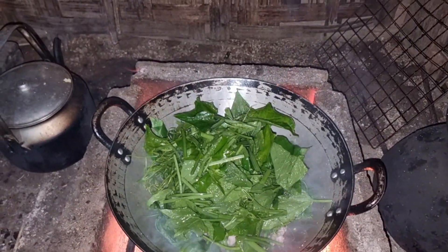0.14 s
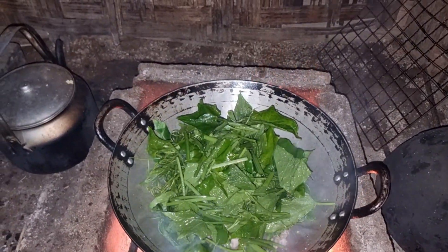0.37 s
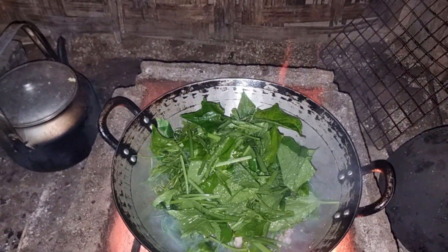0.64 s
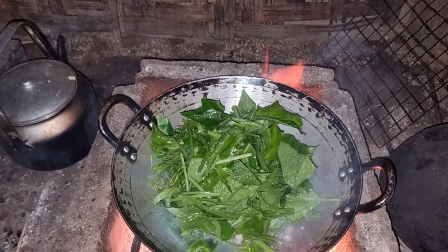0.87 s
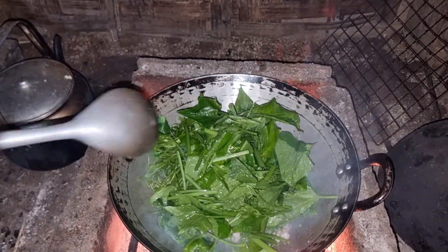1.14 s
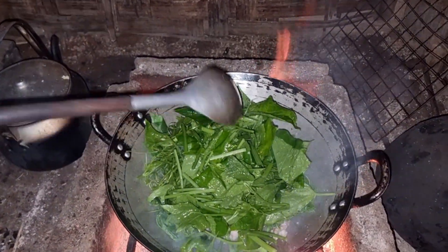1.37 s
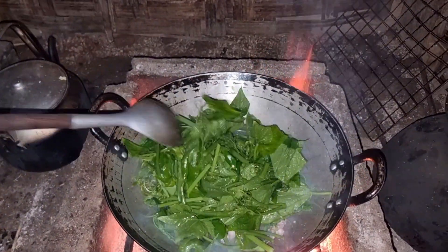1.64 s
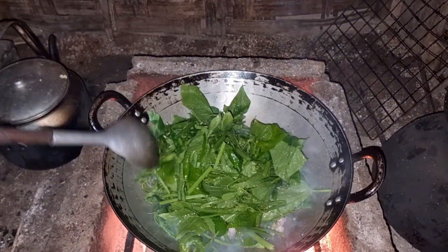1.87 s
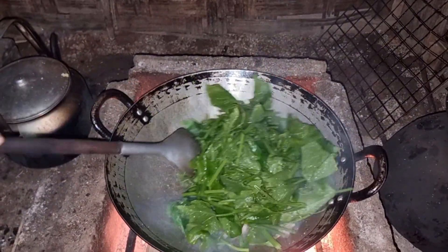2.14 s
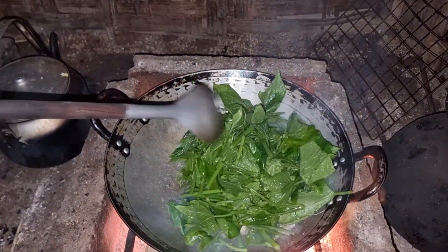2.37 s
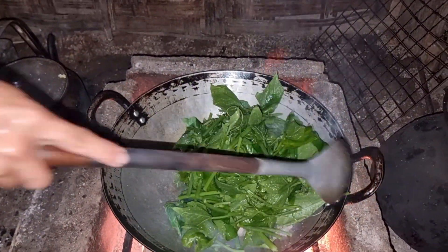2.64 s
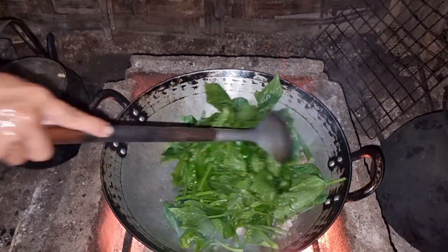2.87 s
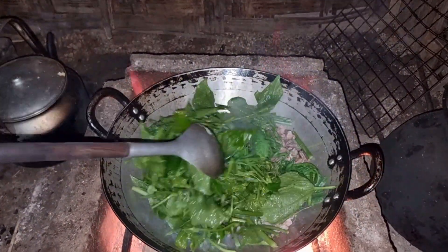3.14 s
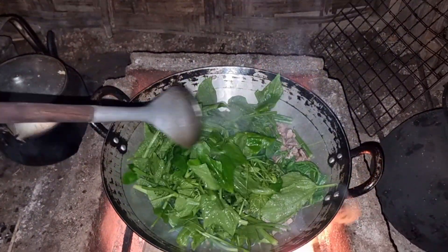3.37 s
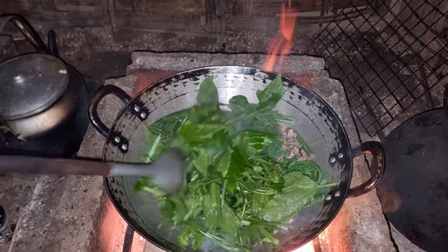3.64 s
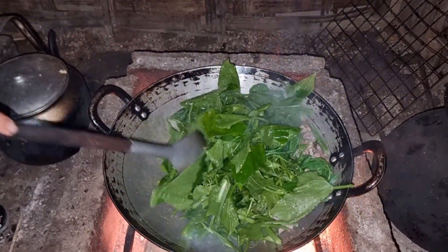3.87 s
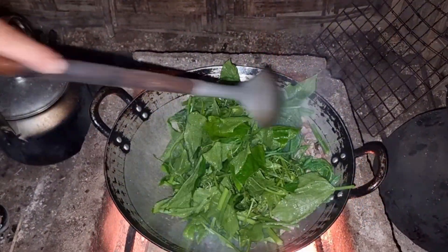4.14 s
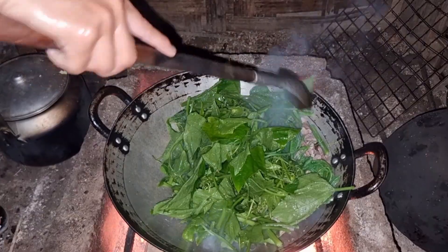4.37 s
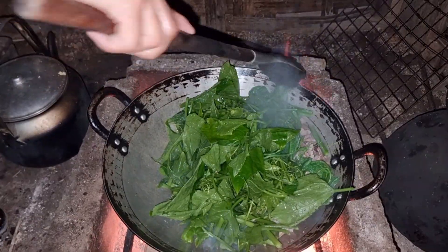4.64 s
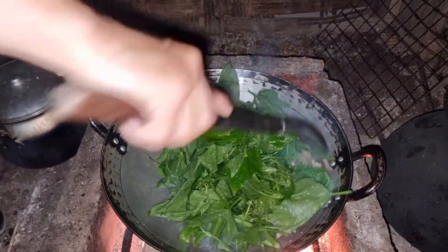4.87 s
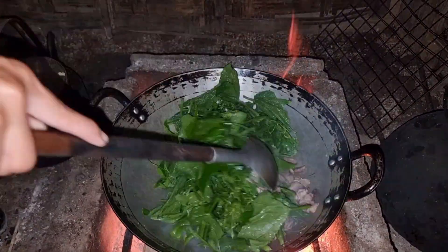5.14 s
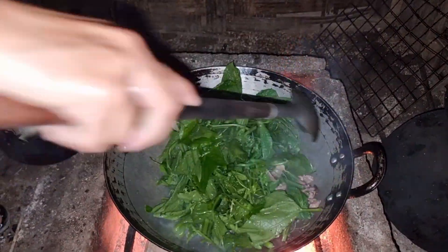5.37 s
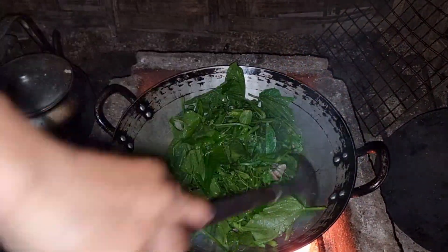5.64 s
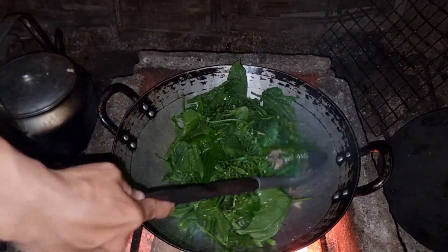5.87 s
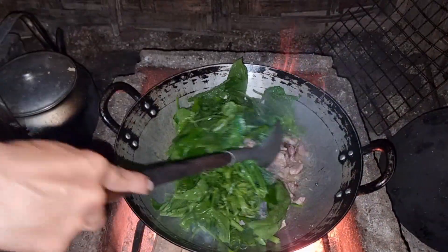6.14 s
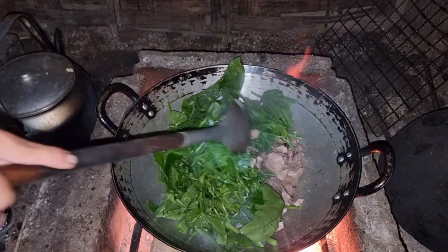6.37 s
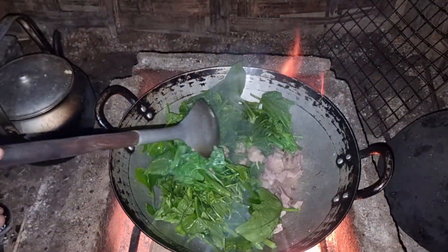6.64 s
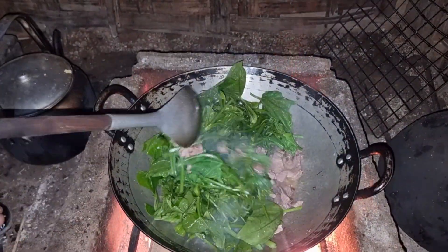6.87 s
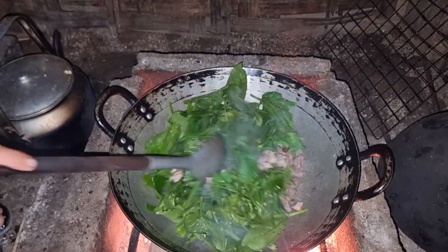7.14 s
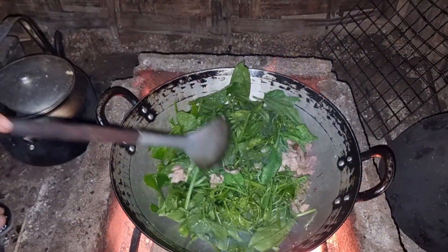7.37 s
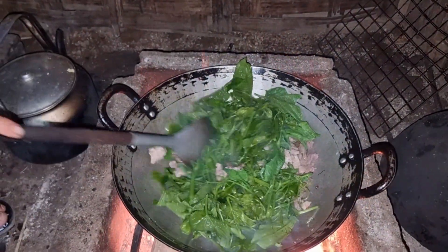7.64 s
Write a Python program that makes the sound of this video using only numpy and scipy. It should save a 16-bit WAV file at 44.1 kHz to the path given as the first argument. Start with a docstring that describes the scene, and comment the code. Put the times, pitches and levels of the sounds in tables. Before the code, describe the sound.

A close stereo sound of meat and wet greens frying in an iron wok. From 0 s a dense, grainy sizzle runs steadily, slightly wavering, over a soft low fire rumble and barely audible kitchen air. A gush of steam begins near 1.6 s, and at about 2 s the hiss swells sharply, leaving the frying fuller and louder by 2.3 s. Short, bright fat spits crack at about 2.4, 2.7 and 3.4 s. Steam surges again at 3.3 and 3.9 s, then briefly at 4.8 and 5.1 s. Around 5 s the ladle gives a dull, damped knock with tiny rebounds; another very faint touch follows at 5.55 s. The fire sinks and the sizzle gradually thins, with a strong spit at 5.85 s and more cracks near 6.8 s. Hiss swells at 7.35 s and again towards the end at 7.7 s.

```python
"""A broad, wavering sizzle comes first: meat and greens fry in an iron wok, over a wood fire's rumble.
Thousands of steam bubbles burst in the fat each second; gushes of steam swell and brighten the sizzle
as a ladle turns wet leaves onto hot iron. Later, large bubbles spit as short pitched cracks and the ladle
knocks the wok, ringing its damped modes. Shaped noise makes the fire and a faint murmur of kitchen air.
Two microphone ports hear the bowl by different paths."""
import sys
import numpy as np
from scipy import signal
from scipy.fft import rfft, irfft, next_fast_len
from scipy.io import wavfile

SR = 44100
rng = np.random.default_rng(int(sys.argv[2]) if len(sys.argv) > 2 else 0)


def output_pcm(signal):
    """Save a mono or channel-first signal as 16-bit PCM at the path in sys.argv[1].

    Samples are clipped to [-1, 1] before scaling.
    """
    pcm = np.clip(np.atleast_2d(signal).T, -1, 1) * 32767
    wavfile.write(sys.argv[1], SR, np.round(pcm).astype(np.int16))


def volts_from_decibels(level):
    """Turn decibel levels (scalar or array-like) into linear amplitude factors."""
    exponent = np.asarray(level, float) / 20
    return 10 ** exponent


N = 341775
SIZE = next_fast_len(N + 8192)
HZ = np.maximum(np.arange(SIZE // 2 + 1) * SR / SIZE, 1)


def rms_one(x):
    """Scale to unit power."""
    return x / np.sqrt(np.mean(x ** 2) + 1e-20)


def curve_in_time(rows):
    """Second column of (s, value) rows, one value a sample."""
    time_s, value = np.transpose(rows)
    return np.interp(np.arange(N) / SR, time_s, value)


def at_hz(points):
    """(Hz, value) points read at every frequency, on a log axis."""
    hz, value = np.transpose(points)
    return np.interp(np.log(HZ), np.log(hz), value)


def shaped(x, response):
    """Filter by a frequency response."""
    return irfft(rfft(x, SIZE) * response, SIZE)[..., :N]


def filtered(x, hz, kind="low"):
    """Second-order Butterworth filter."""
    return signal.sosfilt(signal.butter(2, hz, kind, fs=SR, output="sos"), x)


def drift(corner_hz):
    """Slow noise of spread 1: two equal poles at corner_hz."""
    step, settle = 40, 2000  # samples per slow point; slow points dropped
    r = np.exp(-2 * np.pi * corner_hz * step / SR)
    noise = rng.standard_normal(N // step + settle + 2)
    slow = signal.lfilter([1], [1, -2 * r, r * r], noise)[settle:]
    return np.interp(np.arange(N) / step, np.arange(len(slow)), rms_one(slow))


def clicks(rows):
    """Click train from (s, dB) rows."""
    out = np.zeros(N)
    for start_s, level_db in rows:
        out[round(start_s * SR)] = volts_from_decibels(level_db)
    return out


def ring(x, hz, t60_s):
    """Damped resonance: a unit click starts a decaying sine of initial height 1."""
    r, w = volts_from_decibels(-60 / (t60_s * SR)), 2 * np.pi * hz / SR
    return signal.lfilter([0, np.sin(w)], [1, -2 * r * np.cos(w), r * r], x + 1e-18)


BURSTS_PER_S = 14000


def bursts(spread_db):
    """Bubbles burst at random moments with random sign; most are small, a few large."""
    size_db = spread_db * np.minimum(rng.exponential(1, N), 6)
    pulses = volts_from_decibels(size_db) * rng.choice([-1, 1], N)
    return rms_one(pulses * (rng.random(N) < BURSTS_PER_S / SR))


# steam as the ladle turns fresh leaves onto the iron; each bubble size takes a share of swell_db
# peak_s, swell_db, fall_s (bell spread after the peak)
STEAM_GUSHES = [(0.1, 1.5, 0.13), (1.65, 4, 0.15), (2.025, 6.5, 0.26), (2.35, 0.5, 0.065),
                (3.307, 3.5, 0.15), (3.857, 5, 0.24), (4.052, 0, 0.19), (4.467, 2, .06),
                (4.778, 5.5, 0.078), (5.098, 6, 0.023), (5.86, 2.8, 0.033), (7.35, 5, 0.19), (7.7, 6, 0.15)]


def gushes_db():
    """Every gush of steam swells and fades as a lopsided bell, in dB."""
    t = np.arange(N) / SR
    total_db = np.zeros(N)
    for peak_s, swell_db, fall_s in STEAM_GUSHES:
        spread_s = fall_s * np.where(t < peak_s, 0.49, 1)  # the rise is shorter
        total_db += swell_db * np.exp(-.5 * ((t - peak_s) / spread_s) ** 2)
    return total_db


# paths to the right port, timed against the left; a negative delay is heard earlier
# delay_ms, pressure_share (before PATH_GAIN and the cap), blur_above_hz
PATHS_TO_RIGHT = [(-.057, -.1, 4840), (.112, .25, 6490), (.409, 1.16, 820), (.656, -.45, 1060),
                  (1.943, .17, 2580), (2.339, -.19, 3270), (2.537, .09, 9000), (3.06, .14, 2710),
                  (3.367, -.12, 1910)]
PATH_GAIN = 1.125  # weight against sound scattered to the right port alone


def right_paths():
    """Bursts both ports share: past the housing and off the rim, dulled by the spread of the spots."""
    paths = 0
    for delay_ms, share, blur_hz in PATHS_TO_RIGHT:
        delay = np.exp(-2j * np.pi * HZ * delay_ms / 1000)
        paths = paths + share * delay / (1 + (HZ / blur_hz) ** 2)
    paths = PATH_GAIN * paths
    return paths / np.maximum(abs(paths) / .96, 1)  # shared part at most 0.96


def port(colour, bowl):
    """Colour of the bursts times the air resonances and dips of the bowl."""
    db = at_hz(colour)
    for hz, width_hz, level_db in bowl:
        db = db + level_db / (1 + (2 * (HZ - hz) / width_hz) ** 2)
    return volts_from_decibels(db)


def wandering(x, depth_db, width_hz, hold_s):
    """Frying spots shift under the leaves: narrow ridges of colour come and go, alike at both ports."""
    hz, s, frames = signal.stft(x, SR, nperseg=1024)
    field = rng.standard_normal(frames.shape[1:])
    for cells, axis in ((width_hz / hz[1], 0), (hold_s / (s[1] - s[0]), 1)):
        bell = np.exp(-.5 * (np.arange(-40, 41) / cells) ** 2)
        field = signal.fftconvolve(field, np.expand_dims(bell, 1 - axis), "same")
    ridges = volts_from_decibels(depth_db * rms_one(field))
    return signal.istft(frames * ridges, SR, nperseg=1024)[1][:, :N]


# colour of the bursts at each port: pitch_hz, relative_db (per Hz)
LEFT_BURST_COLOUR = [(150, -35), (250, -25.2), (450, -16), (530, -10), (600, -7.2), (1000, -0.3),
                     (1600, -3.9), (2900, -1.5), (4300, -6.6), (4900, -9), (6000, -8.3), (9000, -10.2),
                     (11000, -9.4), (12500, -7.2), (15500, -5.5)]
RIGHT_BURST_COLOUR = [(150, -33), (250, -23.2), (450, -19), (530, -14), (600, -11.7), (1000, -3.0),
                      (1600, -1.5), (2900, 5.2), (4400, -6), (5000, -11.5), (6000, -12.7), (9000, -14.1),
                      (11000, -10.7), (12500, -3.3), (15500, -6.4)]
# air resonances and dips of the bowl at each port: pitch_hz, width_hz, level_db
LEFT_BOWL_AIR = [(269, 24, 4.2), (307, 8, 4.5), (484, 26, -3.3), (569, 85, 3.1), (722, 107, -2.5),
                 (1043, 26, 1.5), (1199, 71, 3.9), (1255, 95, -4.4), (1367, 30, 4.4), (1482, 57, -3.1),
                 (1692, 165, 2.2), (1856, 85, -3.0), (2442, 180, 6.7), (2540, 392, -5.0), (2868, 167, 3.6)]
RIGHT_BOWL_AIR = [(311, 27, 3.5), (343, 25, -6.1), (377, 38, 5.0), (491, 9, -5.6), (567, 34, 5.8),
                  (671, 13, -4.1), (739, 80, 6.5), (800, 25, -4), (930, 45, -8.9), (1171, 28, 2.3),
                  (1254, 25, -3.5), (1302, 26, 3.8), (1367, 28, 5.1), (1472, 166, -6.5), (1892, 47, 3.5),
                  (2030, 145, 5.0), (2151, 329, -5.5), (2620, 170, -3), (2873, 110, 2.7), (3170, 120, -2.5),
                  (3400, 300, 2), (13950, 300, 2.5)]
# how much wet food lies on hot iron: time_s, vigour_db (each bubble size takes a share of its swing)
WET_FOOD_VIGOUR = [(0, -27), (1.4, -27), (2.09, -30.5), (2.2, -26), (2.34, -21), (2.5, -22), (2.8, -23.5),
                   (3.65, -25), (3.9, -22.5), (4.3, -22), (4.85, -22), (5.05, -24), (5.3, -26),
                   (6.1, -26.5), (7.05, -27.5), (7.3, -28), (7.75, -29.5)]
MEAN_VIGOUR_DB = -25
# bubble sizes, large to fine:
# level_db (at mean vigour), vigour_share, gush_share, common_flicker_db, own_flicker_db
JUICE_BUBBLES = (-33, 0.6, 0.18, 0.23, -0.18)
SIZZLE_BUBBLES = (-24.5, 1.01, 0.29, 0.64, 0.48)
HISS_BUBBLES = (-24.5, 1.32, 0.89, -0.46, 0.55)
DULL_HZ, FINE_HZ = 1400, 5000  # bubbling gives way to sizzle, sizzle to hiss


def frying():
    """Dense bursts at both ports; three bubble sizes follow vigour and gushes, the finest most."""
    swing_db = curve_in_time(WET_FOOD_VIGOUR) - MEAN_VIGOUR_DB
    gush_db = gushes_db()
    left, other = rfft([bursts(spread_db=2.5), bursts(spread_db=1.57)], SIZE)
    shared = right_paths()
    right = shared * left + np.sqrt(1 - abs(shared) ** 2) * other
    heard = np.array([left * port(LEFT_BURST_COLOUR, LEFT_BOWL_AIR),
                      right * port(RIGHT_BURST_COLOUR, RIGHT_BOWL_AIR)])
    moving = wandering(irfft(heard, SIZE)[:, :N], depth_db=2.0, width_hz=30, hold_s=0.065)

    dull = 1 / (1 + (HZ / DULL_HZ) ** 8)
    fine = 1 / (1 + (FINE_HZ / HZ) ** 8)
    bands = ((dull, JUICE_BUBBLES), (1 - dull - fine, SIZZLE_BUBBLES), (fine, HISS_BUBBLES))
    common_flicker = drift(29)  # slow random flicker: sizzle and bubbling rise as the hiss sinks
    out = 0
    for band, (mean_db, vigour_share, gush_share, common_db, own_db) in bands:
        level_db = mean_db + vigour_share * swing_db + gush_share * gush_db
        flicker_db = common_db * common_flicker + own_db * drift(14)
        layer = shaped(moving, band)
        layer = layer / np.std(layer.mean(axis=0))
        out = out + volts_from_decibels(level_db + flicker_db) * layer
    return out


# the fire's rumble swells three times, then sinks: time_s, rumble_db
FIRE_LEVEL = [(0, -47), (1.5, -44), (1.9, -46.5), (2.25, -43), (3.6, -47.5), (4.6, -43), (5.2, -49),
              (6, -51), (7.75, -51.5)]
# spectrum of the flames: pitch_hz, relative_db (per Hz)
FLAME_COLOUR = [(15, -56), (25, -30), (63, -6.5), (80, 2), (95, 0.5), (139, -13), (221, -27), (430, -56),
                (730, -120)]


def fire():
    """Turbulent flames: low lumpy noise, nearly the same at both ports."""
    mid, side = shaped(rng.standard_normal((2, N)), volts_from_decibels(at_hz(FLAME_COLOUR)))
    stereo = mid + volts_from_decibels(-21) * side * np.array([[1], [-1]])
    stereo = stereo * volts_from_decibels([[-.5], [.5]])
    level_db = curve_in_time(FIRE_LEVEL) + 1.0 * drift(18)
    return rms_one(stereo) * volts_from_decibels(level_db)


# spectrum of the kitchen air: pitch_hz, relative_db (per Hz)
ROOM_COLOUR = [(60, -30), (110, 1), (160, 7), (220, -7), (400, -31)]
ROOM_LEVEL_DB = -59.5


def room_tone():
    """Kitchen air: a faint, steady low murmur, a little different at each port."""
    response = volts_from_decibels(at_hz(ROOM_COLOUR)) / (1 + (HZ / 500) ** 4)
    mid, side = shaped(rng.standard_normal((2, N)), response)
    return volts_from_decibels(ROOM_LEVEL_DB) * rms_one(mid + volts_from_decibels(-8) * side * np.array([[1], [-1]]))


# single loud spits of fat: start_s, click_db, pitch_hz
FAT_SPITS = [(2.3684, -9, 3000), (2.6973, -6, 2430), (3.3687, -9, 3000), (3.8309, -9, 5000),
             (4.0393, -8, 2400), (4.4402, -7, 4000), (4.7994, -6, 2600), (5.0962, -6, 6500),
             (5.449, -12, 2860), (5.6642, -12, 3000), (5.8493, -1, 3000), (6.2824, -12, 2850),
             (6.6048, -13, 2880), (6.748, -8, 3250), (6.8253, -5, 4400), (7.5294, -10, 2600)]
SPIT_LAG_S = 0.00003  # spits leap near the middle: almost no lag between ports
RIM_ECHO_S, RIM_ECHO_DB = 0.0026, -3  # right port hears each again off the far rim


def spits():
    """One large bubble: a crack that rings a few cycles at its own pitch, with no low push."""
    out = np.zeros(N)
    for start_s, click_db, hz in FAT_SPITS:
        click = clicks([(start_s, click_db)])
        out += ring(click, hz, t60_s=7.0 / hz) + .6 * np.diff(click, prepend=0)
    out = filtered(out, 1200, "high")
    direct = np.roll(out, round(SPIT_LAG_S * SR))
    echo = volts_from_decibels(RIM_ECHO_DB) * np.roll(out, round(RIM_ECHO_S * SR))
    return np.array([out, direct + echo])


# ladle against the wok: start_s, blow_db, soften_above_hz
LADLE_KNOCKS = [(4.9805, -11, 800), (4.993, -20, 800), (5.006, -19, 800), (5.55, -31, 400)]
# modes of the loaded wok: pitch_hz, level_db, t60_s
LOADED_WOK_MODES = [(141, -21, 0.13), (268, -22, 0.14), (397, -24, 0.12), (487, -2.5, 0.032)]


def ladle():
    """Padded blows, low-passed clicks, ring the wok's damped modes; the lowest notes hardly radiate."""
    blow = sum(filtered(clicks([(start_s, blow_db)]), soft_hz)
               for start_s, blow_db, soft_hz in LADLE_KNOCKS)
    modes = sum(volts_from_decibels(level_db) * ring(blow, hz, t60_s) for hz, level_db, t60_s in LOADED_WOK_MODES)
    return filtered(modes, 130, "high") * volts_from_decibels([[.6], [-.6]])


def scene():
    """All sources as the two ports hear them."""
    return frying() + fire() + room_tone() + spits() + ladle()


def top_cut(x):
    """Nothing passes above the cut-off."""
    return signal.sosfilt(signal.butter(12, 16830, fs=SR, output="sos"), x)


def record(dry):
    """Soft saturation rounds the peaks, then a steep low-pass at 15520 Hz cuts the top."""
    rounded = 1.1 * np.tanh(dry / 1.1)
    low_pass = 1 / (1 + np.exp(np.clip((HZ - 15520) / 14, -50, 50)))
    finished = shaped(rounded, low_pass)
    return top_cut(finished)


dry = scene()
out = record(dry)
output_pcm(out)
```